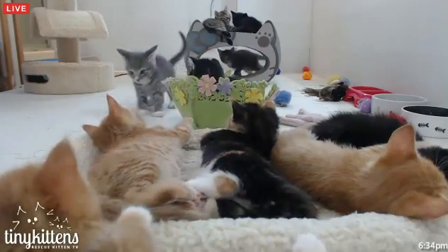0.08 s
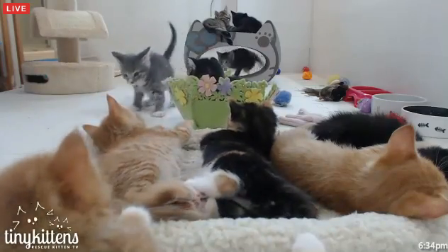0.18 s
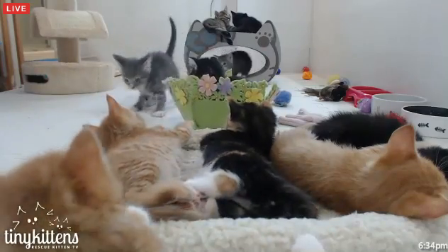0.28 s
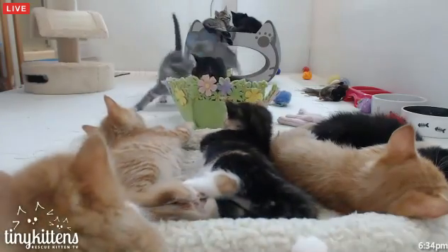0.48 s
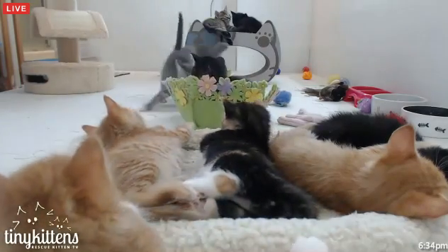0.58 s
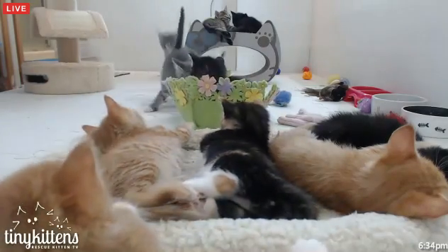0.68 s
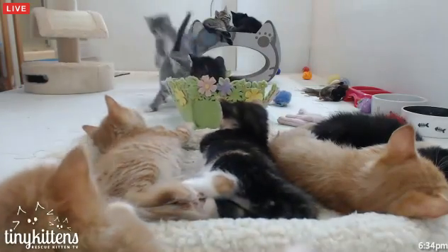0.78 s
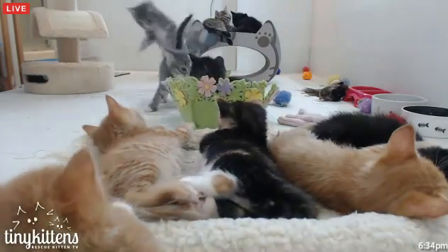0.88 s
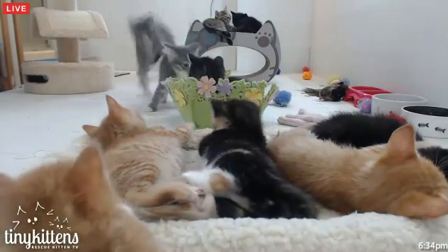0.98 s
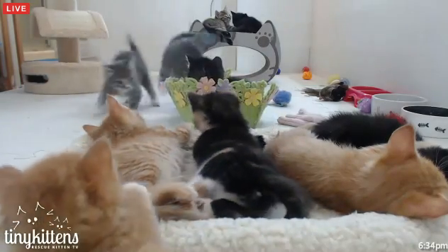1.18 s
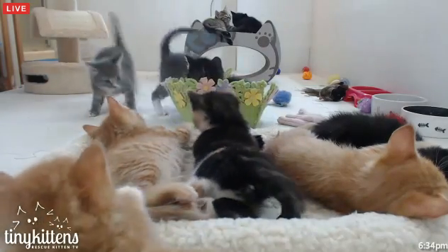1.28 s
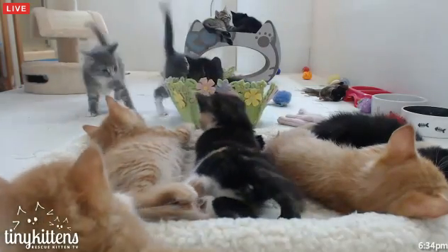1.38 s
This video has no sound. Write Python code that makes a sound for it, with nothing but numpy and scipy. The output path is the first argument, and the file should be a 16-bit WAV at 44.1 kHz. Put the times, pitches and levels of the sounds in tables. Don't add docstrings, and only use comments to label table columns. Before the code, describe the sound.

Soft thumps of romping kittens in a small, slightly reverberant room. Faint rumble, hiss, thin whines and close fur rustling open. At about 0.23-0.3 s a cluster of dull, hollow bumps hits floor and basket; at 0.47-0.53 s comes the heaviest, boomy landing. Lighter knocks follow at 0.65-0.9 s, one at 1.0 s, then scuffs, small bumps and crisp claw ticks from 1.17 to 1.38 s.

```python
import sys
import numpy as np
from scipy import signal
from scipy.fft import rfft, irfft, next_fast_len
from scipy.io import wavfile
from scipy.ndimage import uniform_filter1d

SR = 44100
rng = np.random.default_rng(int(sys.argv[2]) if len(sys.argv) > 2 else 0)


def volts_from_db(level):
    exponent = np.asarray(level, float) / 20
    return 10 ** exponent


def generate_wav(signal):
    frames = np.transpose(np.atleast_2d(signal))
    scaled = np.clip(frames, -1, 1) * 32767
    pcm = np.round(scaled).astype(np.int16)
    wavfile.write(sys.argv[1], SR, pcm)


N = 61740


def read(points, hz):
    f, value = np.transpose(points)
    return np.interp(np.log(hz + 1), np.log(f + 1), value)


def evened(x):
    return x / np.sqrt(np.mean(x ** 2) + 1e-20)


def band(x, order, low_hz, high_hz):
    return signal.sosfilt(signal.butter(order, [low_hz, high_hz], "band", fs=SR, output="sos"), x)


def add(mix, s, sound):
    part = mix[..., round(s * SR):][..., :sound.shape[-1]]
    part += sound[..., :part.shape[-1]]


def left_louder(x, db):
    return x * volts_from_db([[db / 2], [-db / 2]])


def coloured(x, spectrum, same):
    hz = np.fft.rfftfreq(N, 1 / SR)
    a, b = rfft(x)
    likeness = np.clip(same(hz), -1, 1)
    pair = np.array([a, likeness * a + np.sqrt(1 - likeness ** 2) * b])
    return evened(irfft(pair * volts_from_db(read(spectrum, hz)) * (hz > 15), N))


# (frequency [Hz], level per Hz [dB])
ROOM_TONE = [(20, 2.5), (130, -2.5), (300, -11), (1000, -20.5), (1350, -35), (3500, -38.5), (6000, -37),
             (8000, -42)]
# (frequency [Hz], correlation [0-1])
PORT_LIKENESS = [(60, 0.96), (240, 0.94), (950, 0.92), (3770, 0.24), (15000, 0.23)]


def air():
    x = coloured(rng.standard_normal((2, N)), ROOM_TONE, lambda hz: read(PORT_LIKENESS, hz))
    return volts_from_db(-47.5) * left_louder(x, -0.9)


# (frequency [Hz], rms level [dB])
STEADY_WHINES = [(2730, -88), (5459, -79), (5491, -82), (6202, -85), (6401, -84), (6508, -84), (6998, -88),
                 (7171, -86), (7197, -89), (7601, -90)]


def whine():
    beep_db, beep_hz = -72, 8000
    beeps_per_s, first_beep_s, beep_on = 30, .003, .3
    t = np.arange(N) / SR
    steady = np.zeros(N)
    for hz, db in STEADY_WHINES:
        steady += np.sqrt(2) * volts_from_db(db) * np.sin(2 * np.pi * (hz * t + rng.random()))
    gate = 1. * ((t - first_beep_s) * beeps_per_s % 1 < beep_on)
    gate = uniform_filter1d(gate, size=40)
    return steady + np.sqrt(2) * volts_from_db(beep_db) * gate * np.cos(2 * np.pi * beep_hz * t)


# (time [s], level [dB])
SCUFF_LEVEL = [(0, -66.5), (.1, -60.5), (.15, -64.5), (.19, -59), (.225, -63), (.27, -54.5), (.39, -58.5),
               (.43, -67), (0.561, -62), (.63, -56), (.72, -58), (.77, -61), (.84, -57), (0.869, -51),
               (.94, -63), (1.165, -71), (1.178, -57.5), (1.3, -55.5)]
# (frequency [Hz], level per Hz [dB])
FUR_TONE = [(700, -21), (1000, -16), (1600, -3), (2200, -4), (3100, 0), (4200, -7), (6000, -13),
            (8000, -20)]


def scuff():
    grains_per_s, grain_db = 7300, 7.5
    draw = rng.random((2, N))
    size = rng.exponential(1, (2, N))
    noise = rng.standard_normal((2, N))
    grains = (draw < grains_per_s / SR) * volts_from_db(grain_db * np.minimum(size, 4)) * np.sign(noise)
    x = coloured(evened(grains) + 0.82 * noise[::-1], FUR_TONE, lambda hz: 0.45 + 0 * hz)
    level_db = np.interp(np.arange(N) / SR, *np.transpose(SCUFF_LEVEL))
    return x * volts_from_db(level_db - 1)


# (time [s], peak level [dB], pitch [Hz])
CLAW_TICKS = [(.07, -53, 3100), (0.256, -50, 2500), (.271, -49, 3250), (.268, -51, 2700), (.286, -51, 2900),
              (0.4688, -47.5, 2460), (0.6815, -43, 3220), (0.792, -48, 3260), (1.005, -58, 2600),
              (1.175, -57, 4550), (1.216, -43, 3400), (1.226, -46.5, 3750), (1.2605, -40, 2540),
              (1.2648, -35.5, 3300), (1.319, -38, 3200), (1.377, -49, 5300), (.8515, -47, 3080),
              (1.261, -41, 3600), (1.311, -47, 3100), (1.324, -48, 3500), (.938, -52, 3300),
              (.977, -55, 3000)]


def ticks():
    rise_s, hiss_db, tail_s = .00048, -12, .009
    out, t = np.zeros(N), np.arange(2000) / SR
    for s, db, hz in CLAW_TICKS:
        hiss = evened(band(rng.standard_normal(2000), 2, .5 * hz, 1.45 * hz))
        click = t / rise_s * np.exp(1 - t / rise_s) * np.sin(2 * np.pi * hz * t)
        add(out, s, volts_from_db(db) * (click + volts_from_db(hiss_db) * hiss * np.exp(-t / tail_s)))
    return out


def padded_blows(table, softness):
    out = np.zeros(N)
    for s, db, hz, rise_s in table:
        t = np.arange(0, 8 * rise_s, 1 / SR)
        swell = (t / rise_s * np.exp(1 - t / rise_s)) ** softness
        add(out, s, volts_from_db(db) * swell * np.sin(2 * np.pi * hz * t))
    return out


# (time [s], peak level [dB],
# pitch [Hz], time to peak [s])
BUMPS = [(.226, -23.5, 147.6, 0.0074), (.258, -23, 112.6, 0.018), (.275, -22, 180, 0.0047),
         (.29, -22, 112.6, 0.0033), (.472, -29, 229, 0.015), (.479, -9.5, 90, 0.015),
         (.526, -21, 85.8, 0.022), (.553, -34, 84, 0.018), (.61, -38, 88.4, 0.018),
         (.655, -28.5, 84.5, 0.014), (.678, -29, 216, 0.0054), (.72, -34.5, 72, 0.019),
         (.462, -27.5, 103.6, 0.0067), (.788, -36, 282, 0.0093), (.8, -40.5, 84, 0.025),
         (.765, -39, 70.6, 0.015), (1.224, -35, 163, 0.011), (.86, -40, 139, 0.0058),
         (.19, -44, 103, 0.0093), (.72, -34, 170, 0.006), (1.195, -37.5, 84.2, 0.026),
         (1.262, -34, 68.5, 0.011), (1.002, -28.5, 70, 0.0052), (1.178, -30.5, 159, 0.009),
         (1.23, -34.5, 66, 0.024), (1.265, -28, 181, 0.0094), (1.28, -35, 150.4, 0.023),
         (1.315, -38, 120, .01), (1.365, -30, 163, 0.0042), (1.375, -32, 293, 0.011),
         (1.288, -40, 300, .012), (.64, -40, 240, .012), (.4, -46, 280, .015), (.575, -33, 95, .02),
         (.955, -37, 45, .025), (1.04, -38, 45, .025), (1.08, -40, 60, .02), (.455, -34, 75, .015),
         (.7, -36, 75, .015), (.25, -31, 280, .008)]


def floor_bumps():
    low_cut = signal.butter(3, 63, "high", fs=SR, output="sos")
    return signal.sosfilt(low_cut, padded_blows(BUMPS, 3))


# (time [s], peak level [dB], pitch [Hz], time to peak [s])
WALL_KNOCKS = [(.226, -33, 560, .006), (.225, -28.5, 436, 0.006), (.226, -34.5, 730, 0.0078),
               (.238, -18.5, 405, 0.0085), (.256, -23, 468, 0.0078), (.253, -24.5, 701, 0.0078),
               (.264, -14.5, 397.4, 0.0099), (.296, -23, 399, 0.0049), (.315, -30, 450, 0.0029),
               (.335, -45, 361, 0.0058), (.37, -42.5, 454, 0.0033), (.469, -13, 503, 0.0024),
               (.478, -14.5, 478, 0.0076), (.474, -26.5, 803.5, 0.0089), (.488, -16.5, 370.4, 0.0086),
               (.492, -25, 540, 0.01), (.505, -32.5, 364, 0.023), (.53, -17.5, 365.8, 0.013),
               (.551, -30.5, 348, .011), (.53, -39.5, 942, 0.013), (.646, -35, 357, .01),
               (1.285, -45, 605, 0.0099), (.722, -27, 388, 0.0033), (.755, -36.5, 432, 0.018),
               (.862, -40, 789.5, 0.012), (.9, -44.5, 886, 0.011), (1.174, -35.5, 740, 0.008),
               (1.18, -40, 1060, .007), (1.2, -42, 960, .006), (1.182, -31.5, 399, 0.0095),
               (1.265, -32, 450, 0.0075), (1.32, -33, 442, 0.0049), (1.371, -35, 750, 0.006),
               (1.38, -29, 670, .007), (1.385, -40, 1000, .008), (1.308, -40, 740, .007),
               (1.272, -40, 900, .005), (.876, -41.5, 900, .01), (.912, -43, 870, .008),
               (.889, -46, 820, .008), (.798, -44, 980, .006), (.565, -42, 530, .015),
               (.585, -42, 370, .015), (.962, -52, 950, .005)]
# (time [s], peak level [dB], pitch [Hz], time to
# peak [s])
RIM_KNOCKS = [(.228, -52.5, 1690, 0.0078), (.256, -45, 1610, 0.0066), (.469, -47.5, 1540, 0.0042),
              (.714, -29, 539, 0.0029), (.792, -42, 830, 0.0017), (1.259, -40, 1630, 0.0015),
              (1.372, -46.5, 1480, 0.0033), (1.006, -41, 336, 0.0013), (1.265, -48, 1720, .006),
              (1.281, -53, 1720, .006), (.798, -53, 1800, .005), (.226, -48, 1450, .006),
              (.476, -48, 1950, .008), (.864, -50, 1750, .005), (.88, -50, 1800, .005),
              (.872, -52, 3100, .006), (1.318, -51, 2450, .005)]


def basket_knocks():
    softness = 3.43
    return padded_blows(WALL_KNOCKS, softness) + padded_blows(RIM_KNOCKS, softness)


# (time [s], level [dB], fade [s], brightness [Hz])
LANDING_PUFFS = [(.228, -35.5, 0.012, 900), (.258, -31, 0.042, 833), (0.471, -27, 0.033, 865),
                 (.53, -45, 0.076, 960), (.643, -43, 0.063, 670), (.713, -36, 0.022, 767),
                 (.74, -42.5, 0.06, 496), (.792, -42.5, 0.037, 970), (.857, -39, 0.035, 980),
                 (0.905, -45, 0.025, 1030), (0.99, -41, 0.005, 830), (1.004, -41, .01, 740),
                 (1.174, -40, 0.066, 950), (1.258, -35.5, 0.014, 1200), (1.315, -42, 0.045, 830),
                 (1.372, -42, 0.056, 1070)]


def puffs():
    rise_s, low_hz = 0.0021, 140
    slap_db, slap_hz, slap_spread = -20.5, 2250, 1.5
    out, t = np.zeros((2, N)), np.arange(8000) / SR
    for s, db, fade_s, bright_hz in LANDING_PUFFS:
        noise = rng.standard_normal((3, 8000))
        dull = band(noise[0], 4, low_hz, bright_hz)
        slap = band(noise[0] + slap_spread * noise[1:], 3, bright_hz, slap_hz)
        shape = np.minimum(t / rise_s, 1) * np.exp(-t / fade_s)
        add(out, s, volts_from_db(db) * (evened(dull) + volts_from_db(slap_db) * evened(slap)) * shape)
    return out


def room(x):
    t60_s = .25
    taps = np.zeros((2, 20000))
    at = np.arange(200, 19980, 20) + rng.integers(0, 20, (2, 989))
    np.put_along_axis(taps, at, rng.choice([-1., 1.], at.shape), 1)
    taps *= volts_from_db(-60 * np.arange(20000) / SR / t60_s)
    taps[1] = 0.83 * taps[0] + .5 * taps[1]
    return signal.fftconvolve(x[None], taps / np.linalg.norm(taps[0]), axes=1)[:, :N]


def scene():
    background = air() + whine()
    rubbing = scuff()
    claws = ticks()
    floor = floor_bumps()
    hits = basket_knocks() + puffs()
    far = room(volts_from_db(-14.5) * floor + volts_from_db(-11.5) * hits[0] + volts_from_db(-8) * claws)
    near = floor + hits + claws + far
    port = band(near.mean(0), 2, 1050, 1800)
    near = near + volts_from_db(-9.5) * port * np.array([[1], [-1]])
    return left_louder(near, -1.4) + rubbing + background


def low_pass(x):
    return signal.sosfilt(signal.butter(12, 15830, fs=SR, output="sos"), x)


def record(dry):
    rate_hz, image_slope, bass_image_db, top_hz = 16000, 2.15, -27, 15800
    size = next_fast_len(N + SR // 10)
    hz = np.fft.rfftfreq(size, 1 / SR)
    low = rfft(dry, size) * (hz < rate_hz / 2)
    flipped = 2 * irfft(low, size) * np.cos(2 * np.pi * rate_hz * np.arange(size) / SR)
    ratio = np.clip((rate_hz - hz) / (hz + 1), 0, 1)
    fading = np.maximum(ratio ** image_slope, volts_from_db(bass_image_db) * ratio) * (hz >= rate_hz / 2)
    both = (low + rfft(flipped) * fading) * np.clip((top_hz - hz) / 100, 0, 1)
    mix = irfft(both, size)[:, :N]
    return low_pass(mix)


dry = scene()
out = record(dry)
generate_wav(out)
```